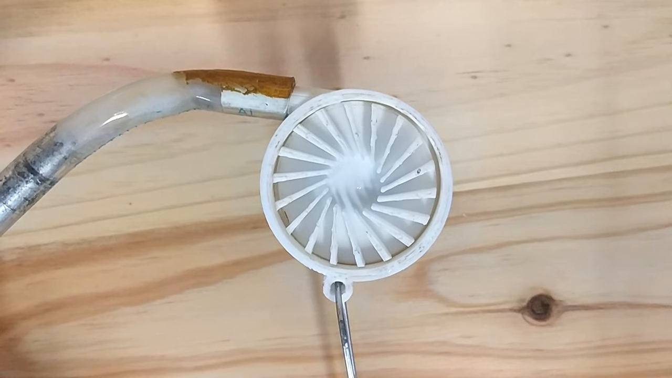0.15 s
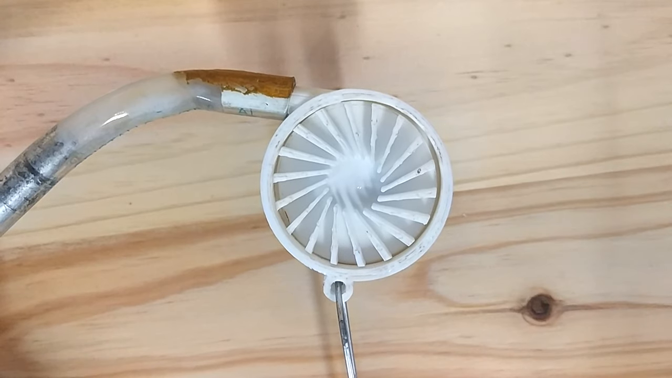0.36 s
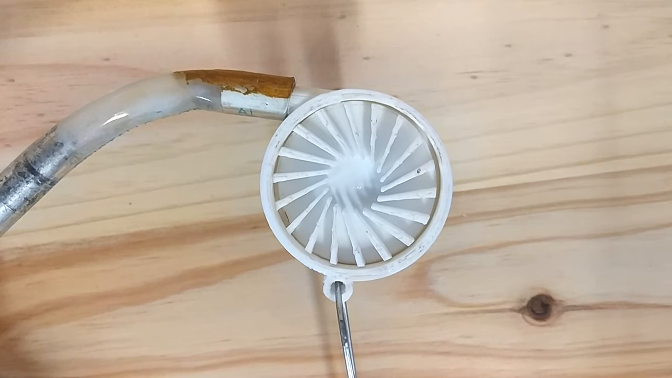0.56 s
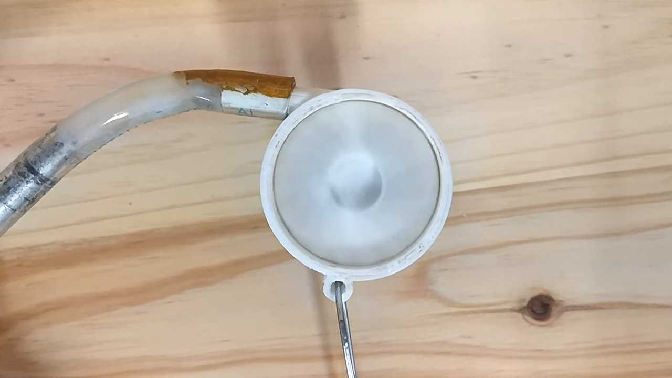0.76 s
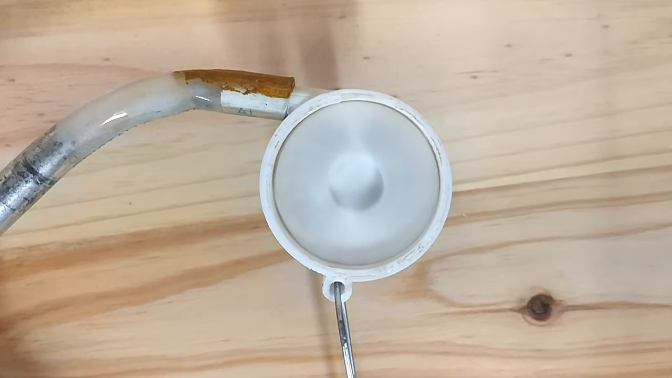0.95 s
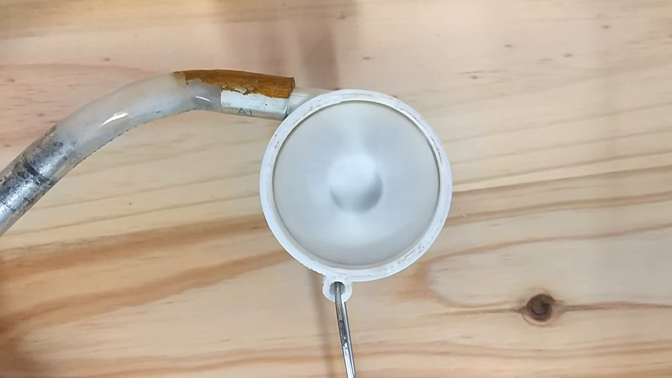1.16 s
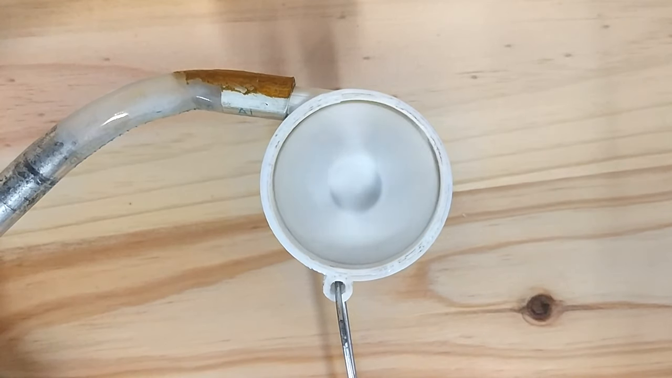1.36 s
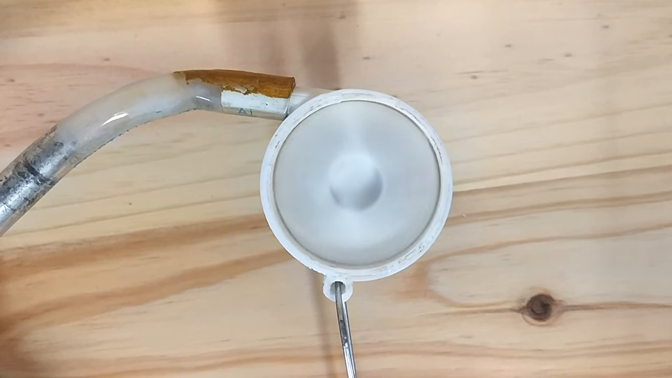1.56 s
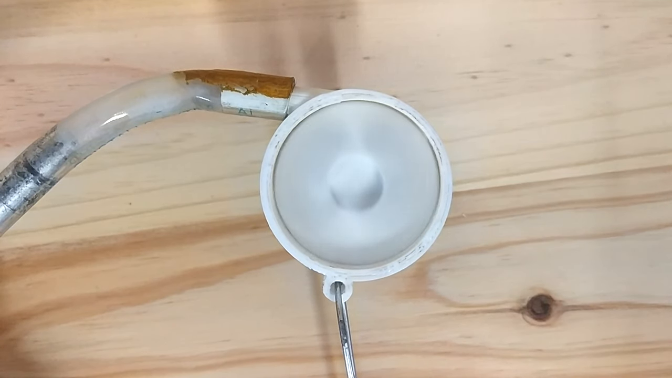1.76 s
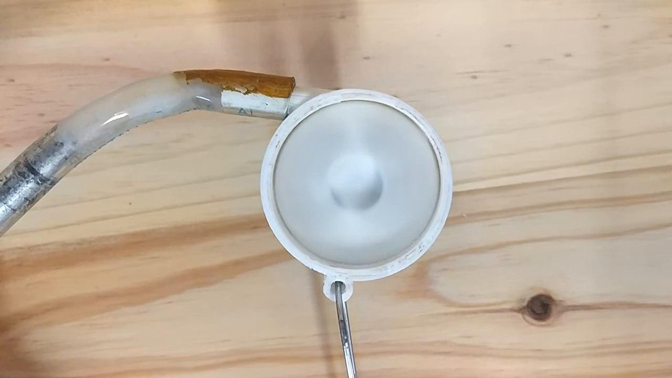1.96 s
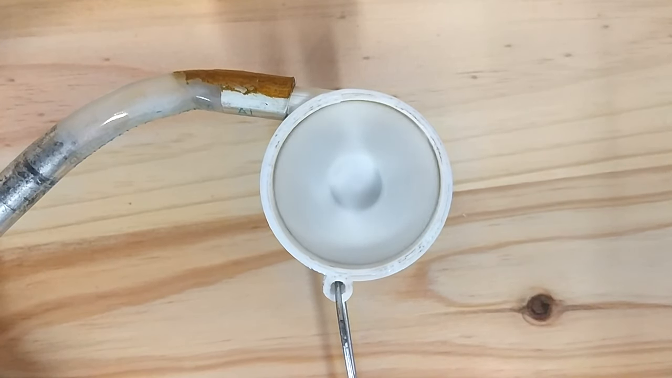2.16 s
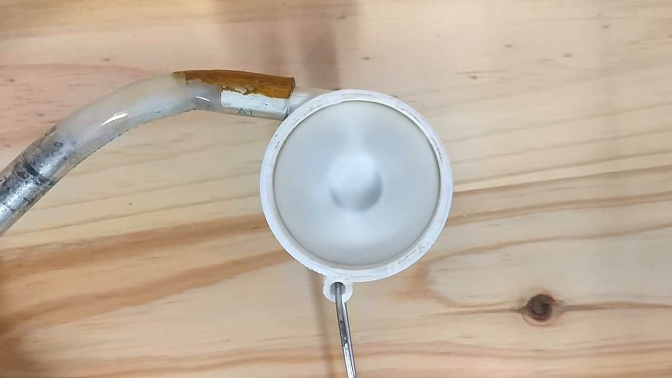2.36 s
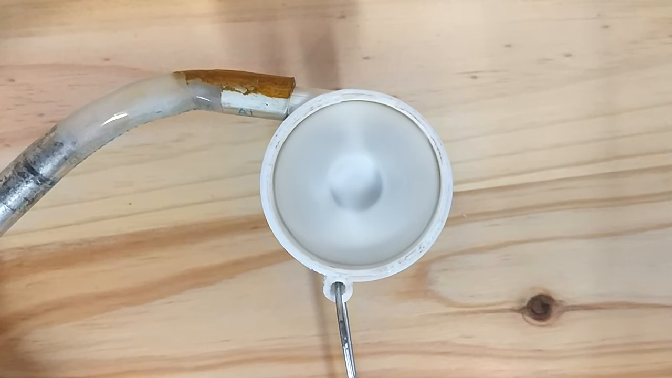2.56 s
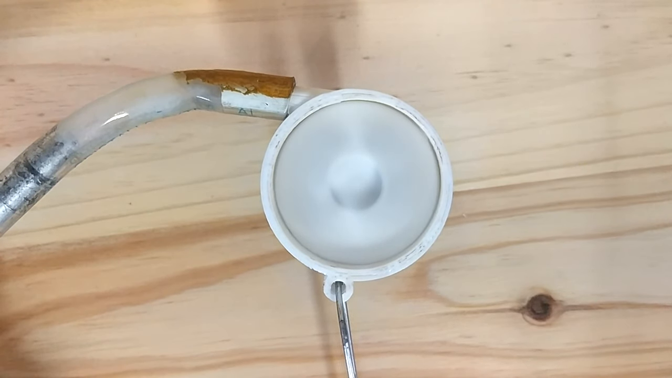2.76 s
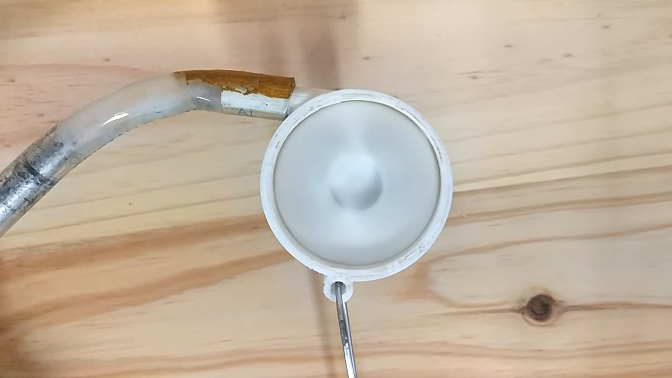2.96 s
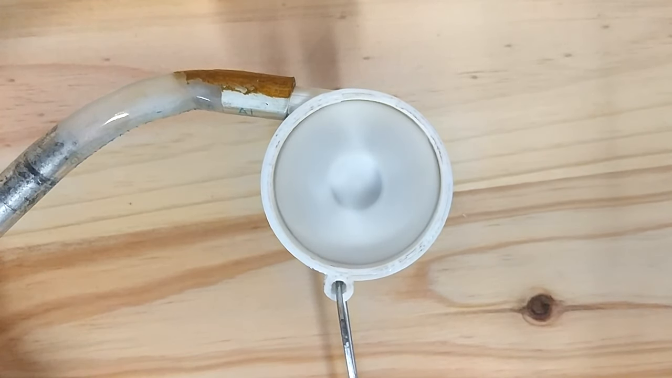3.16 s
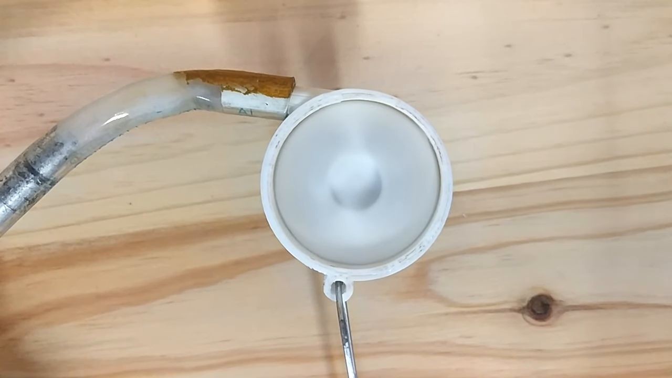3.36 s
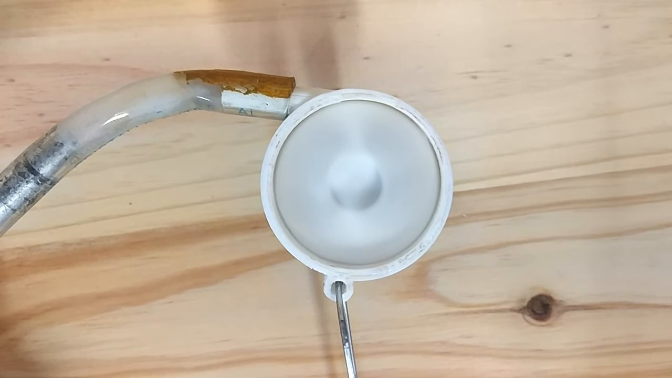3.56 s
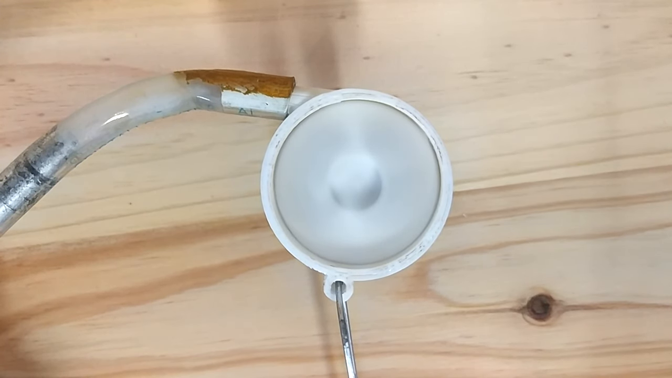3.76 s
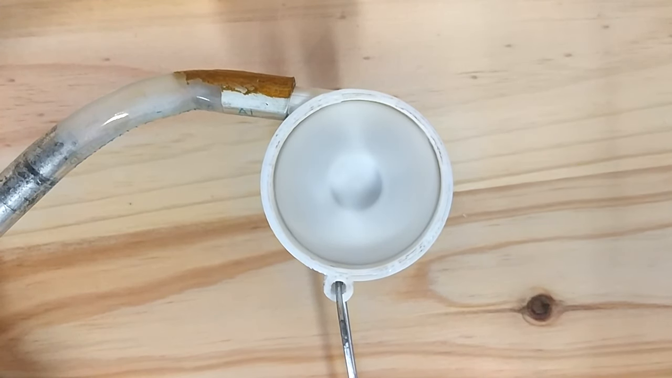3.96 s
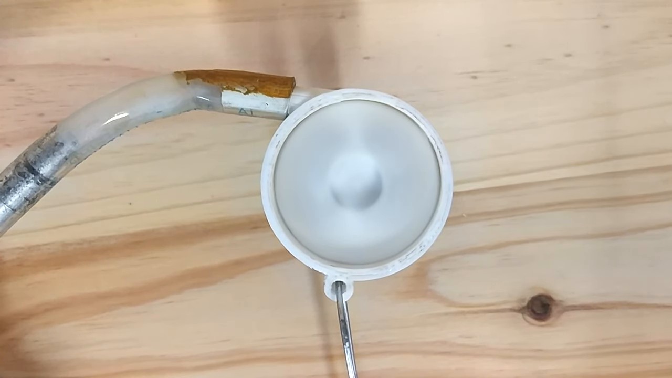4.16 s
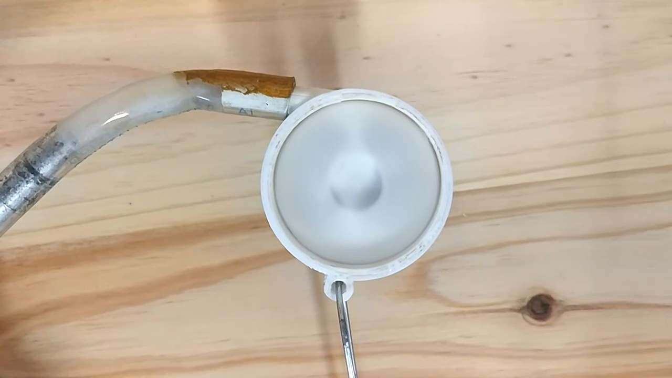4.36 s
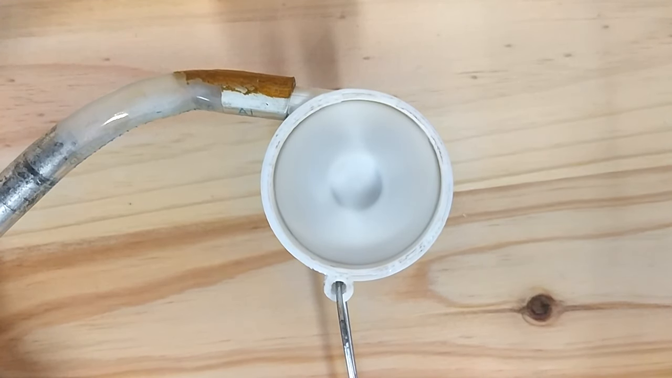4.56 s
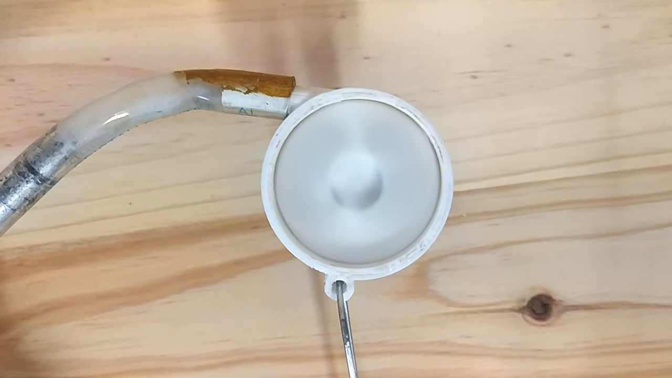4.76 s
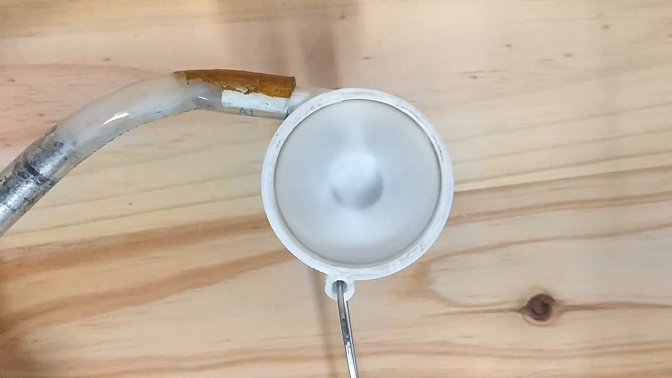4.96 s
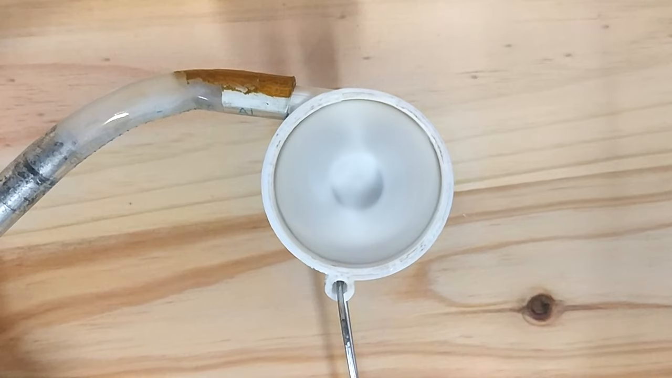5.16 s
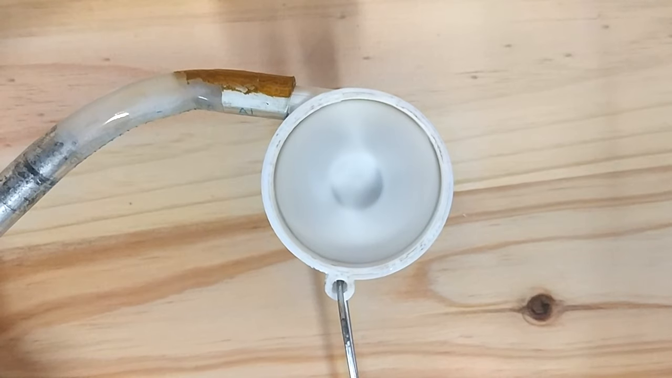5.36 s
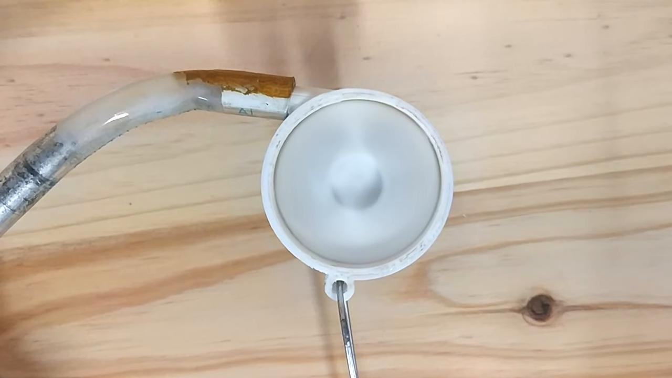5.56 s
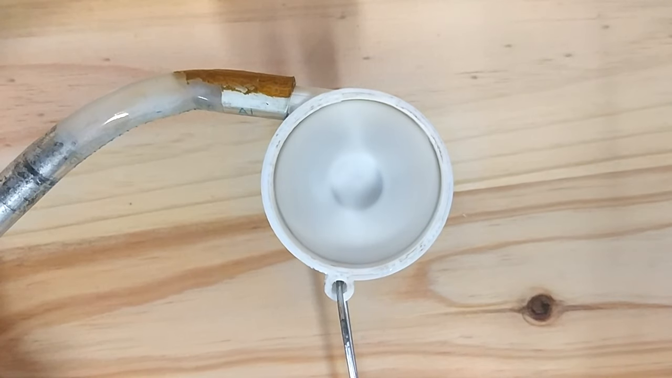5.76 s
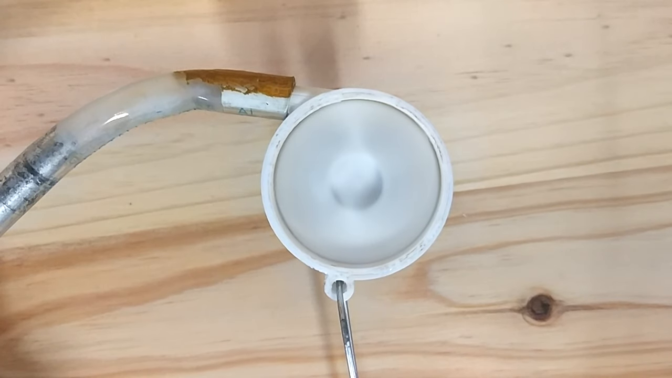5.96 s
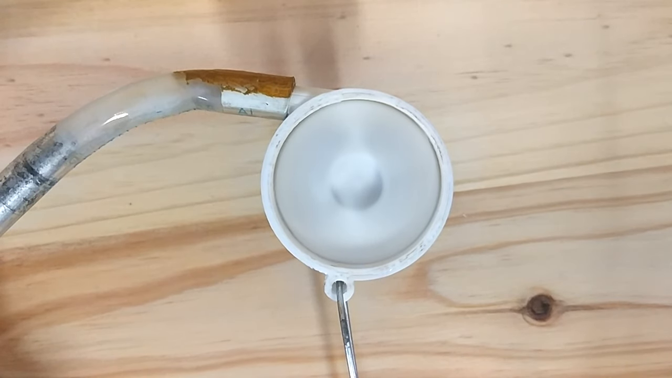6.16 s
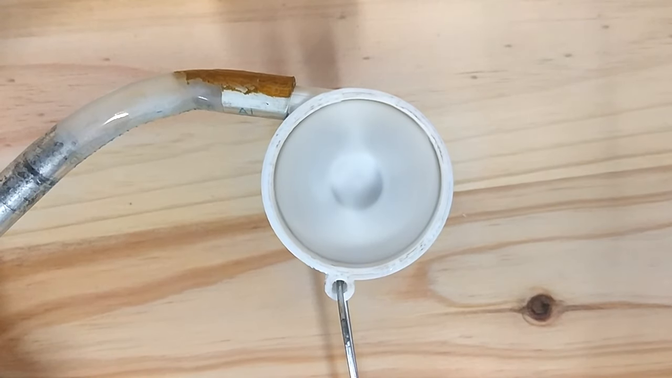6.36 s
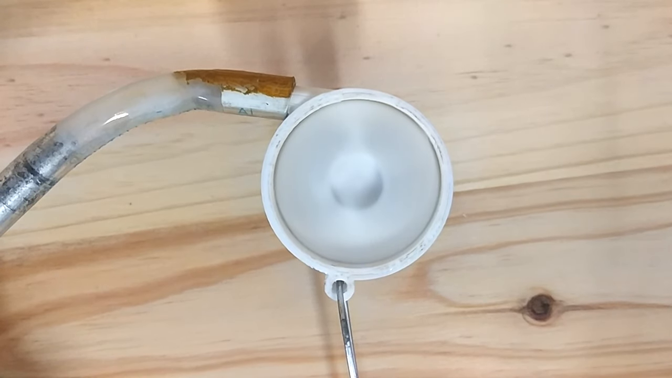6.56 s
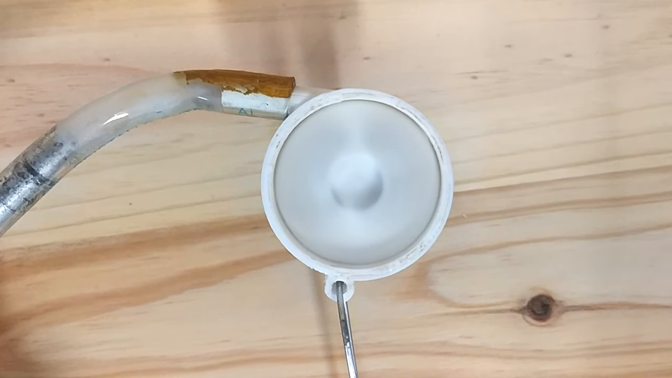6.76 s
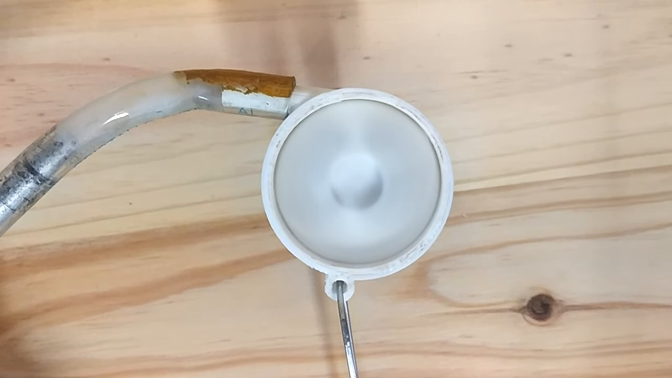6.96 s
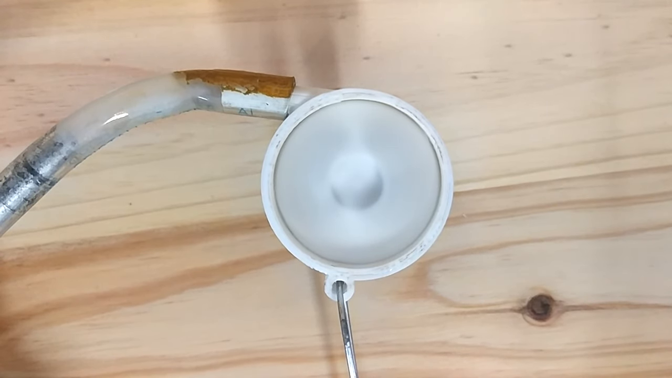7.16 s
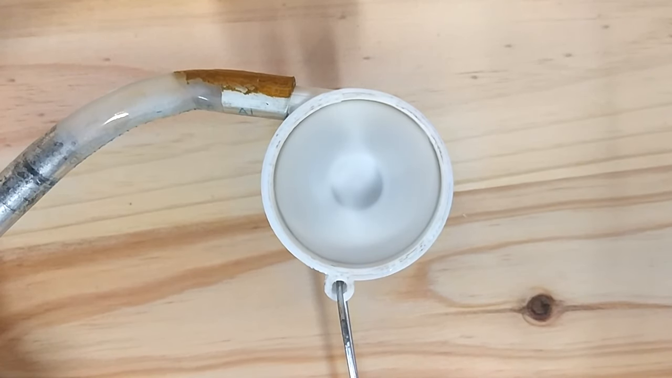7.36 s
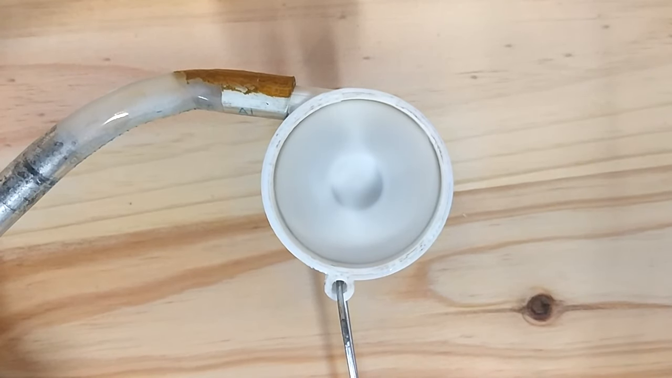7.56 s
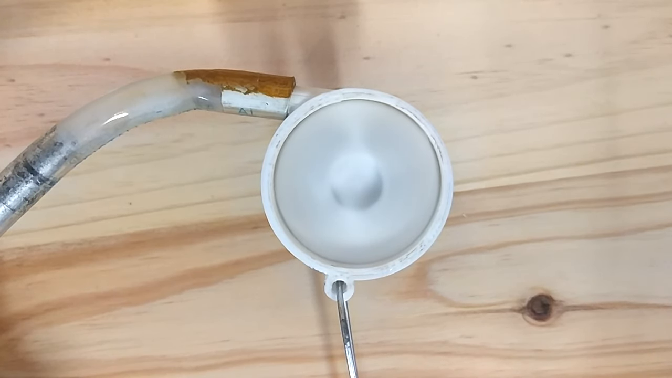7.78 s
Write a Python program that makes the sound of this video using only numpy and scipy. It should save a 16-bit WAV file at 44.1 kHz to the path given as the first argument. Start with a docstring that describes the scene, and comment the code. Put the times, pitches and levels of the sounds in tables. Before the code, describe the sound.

A short blast of compressed air starts a small plastic turbine, then the hiss steps up louder while a wavering blade whine climbs in pitch.

```python
"""Air-driven turbine on a workbench

A small plastic turbine with 18 blades stands on a wooden bench in a quiet workshop, close to a phone's two
microphone ports. A short blast of compressed air starts the rotor, then the valve opens step by step.
Filtered noise makes the jet's hiss, swayed once a turn while the rotor is slow; sine lines at multiples
of the turning rate make the blades' wavering whine; noise and knocks through resonances make the bench drone.
"""
import sys
import numpy as np
from scipy import signal
from scipy.fft import rfft, irfft
from scipy.io import wavfile

SR = 44100
rng = np.random.default_rng(int(sys.argv[2]) if len(sys.argv) > 2 else 0)


def dump_mix(stems):
    """Bounce the given channels to the path in sys.argv[1] as a 16-bit WAV at rate SR."""
    frames = np.atleast_2d(stems).T  # one column per channel
    limited = np.clip(frames, -1, 1)  # hard clip at full scale
    pcm = np.round(limited * 32767).astype(np.int16)
    wavfile.write(sys.argv[1], SR, pcm)


N = 344862
TIME = np.arange(N) / SR  # s
FREQ = np.maximum(np.arange(N // 2 + 1) * SR / N, 1)  # Hz, kept off zero

# Quiet workshop, its tone colour. Each row: frequency in Hz, relative level in dB.
ROOM_COLOUR = [(40, -36), (100, -18), (140, -28), (185, 7), (243, 6), (275, -1), (450, -3.5), (1100, -1),
               (2000, 3.5), (8500, 4), (12000, -5), (15000, -12)]
# Faint tones after the starting blast. Each row: frequency in Hz, starting level in dB, fall by 60 dB in seconds.
RINGING_TONES = [(592.2, -73.5, 4), (1723, -74.5, 12)]
# Modes of the bench top. Each row: frequency in Hz, width in Hz, gain in dB.
BENCH_MODES = [(166, 18, -13), (181, 11, 0.5), (189, 12, -4), (203, 24, -11), (242, 19, -1.5),
               (291, 24, -8), (343, 22, -5), (380, 36, -7)]
# Knocks of the unbalanced rotor. Each row: multiple of the turning rate,
# level in dB at top speed before the bench top colours it.
ROTOR_KNOCKS = [(2, -41.5), (3, -45.5), (4, -51)]
# Colour of the spent air. Each row: frequency in Hz, relative level in dB.
EXHAUST_COLOUR = [(30, -39), (80, -18), (135, -11), (200, 6.5), (400, 3), (520, 0), (700, 2), (1000, -0.5),
                  (1300, -12), (2000, 12.5), (3500, -65), (8000, -40)]
# Eddies shed by the blades. Each row: multiple of the turning rate, width in Hz, level in dB at full flow,
# delay at the left port in samples.
SHED_EDDIES = [(18.5, 150, -44, 12), (36.6, 230, -47, 6)]
# Howl of slipping blades. One row: multiple of the turning rate, width in Hz, level in dB when fully there.
SLIP_HOWL = (18.3, 70, -49)
# Blade tone and the sidebands of uneven blades. Each row: multiple of the turning rate, relative level in dB.
BLADE_LINES = [(11, -20), (12, -20), (14, -16), (15, -20), (16, -10), (17, -11), (18, 0), (19, -4),
               (20, -16), (36, -10), (37, -12)]
# Air resonances of casing and blade pockets. Each row: frequency in Hz, width in Hz,
# relative level in dB at gentle flow, relative level in dB at full flow.
CASING_RESONANCES = [(2567, 700, -19.5, -14), (3138, 210, -15, -9), (3580, 160, -18, -10.5),
                     (4326, 470, -11.5, -5.5), (4997, 700, -5.0, -3), (5897, 284, -4.5, -1),
                     (6175, 320, -8.5, 3), (6790, 570, -4.5, -4), (7165, 670, -0.5, -0.5),
                     (7846, 430, 0, 1.5), (8450, 470, -11, 2.5), (9000, 330, -13, -15), (9230, 880, -6, 3),
                     (10010, 390, -4.5, 0), (10360, 340, -1, 0.5), (10920, 530, -4.5, -2.0),
                     (12200, 250, -7, -10), (12160, 280, -6.5, 4), (12800, 720, -13, -1.5),
                     (13340, 350, -5.5, 2), (14250, 670, -9, -7), (14900, 320, -25, -2),
                     (15680, 290, -27, -11.5)]
# Broad hiss of the free jet. Each row: frequency in Hz, relative level in dB at gentle flow, the same at full flow.
JET_COLOUR = [(300.0, -95, -77), (1014, -29, -18), (2360, -28.5, -16.5), (3820, -38, -17.5),
              (5100, -15.5, -4), (6800, -18, -2.5), (9620, -9, -3), (13650, -18, -10), (16100, -34, -11.5)]
# Notches where the narrow jet meets its reflection from the bench. Each row: frequency in Hz, width in Hz,
# gain in dB at the left port, gain in dB at the right port.
BENCH_NOTCHES = [(3870, 180, -11, -6), (4550, 170, -8, -10), (5630, 200, -16, -2), (6200, 130, -20, 0),
                 (6530, 150, -9, -5), (7560, 160, -9, -1), (8180, 150, -8, 0), (8580, 240, -13, 0),
                 (9120, 150, -11, 0), (10150, 160, -8, 0), (11120, 380, -16, 0), (11680, 160, 0, -5),
                 (13100, 180, -4, -4), (13720, 160, -6, -6), (14620, 200, -7, -2), (15430, 380, -14, -4)]
# Each turn of the valve. Each row: start in seconds, time it takes in seconds, jet strength reached in dB,
# rotor speed it sustains in turns per second.
VALVE_TURNS = [(.7, 0.0394, -47, 9.2), (1.2, 0.2503, -38, 12), (1.52, 0.0511, -33, 20),
               (1.899, .11, -29, 28), (2.67, .12, -25, 56.3), (3.97, .11, -22.5, 75.2),
               (4.3, .53, -20, 79.5)]
# The rotor runs freer or drags for a moment. Each row: start in seconds, build-up in seconds,
# change in turns per second.
ROTOR_SURGES = [(2.94, .2, 3.9), (3.39, .24, 5.3), (4.01, .16, 4), (4.19, .13, 5.7), (4.57, .05, -5.5),
                (4.88, .1, 12.5), (5.57, .03, 3.5), (5.93, .02, 3), (6.04, .19, 9), (6.41, .05, -3),
                (6.62, .05, 3.5), (6.83, .08, 1.7), (6.94, .19, 6.6), (7.35, .32, 7.4)]

ROOM_DB = -60.5
PORT_LAG_SAMPLES = 12  # the left port is further away
TOP_HZ = 15720  # upper limit of the microphone
# Starting blast: jet strength at its peak, then its timing
BLAST_S, BLAST_DB = 0.6935, -27.5
BLAST_ATTACK_S, BLAST_HOLD_S, BLAST_RELEASE_S = 0.043, 0.076, 0.033
# Each of the rotor's two lags behind the valve, fading of a surge, usual speed with the valve wide open
INERTIA_S, SETTLE_S, TOP_SPEED = .089, .225, 83  # TOP_SPEED in turns per second
# Jet strength at which the jet begins to broaden and at which it fills the casing ("full flow")
GENTLE_DB, FILLED_DB = -26.5, -19.5
# Left minus right level at gentle and at full flow; the higher the power, the later the sound swings round
HISS_PAN_DB, WHINE_PAN_DB, SWING_POWER = (-11.5, -2.5), (-6.5, 3.5), 0.93
# Blade tone: level at full flow and top speed, growth with filling and with speed
WHINE_DB, WHINE_FILL_POWER, WHINE_SPEED_POWER = -41.8, .6, 1.0
WHINE_LAG_SAMPLES = (7.5, 12.5)  # delay at the left port at gentle and at full flow
# Acceleration at which the blades slip fully (turns per second per second), and what that adds to the tone
SLIP_ACCELERATION, SLIP_DB = 90, -5
HOWL_SPEED = 36  # turns per second from which the howl can be fully there
CALM_CHURN = .3  # unsteadiness of the blade tone at gentle flow, as a share of that at full flow
# Unsteadiness of each blade line at full flow: depth, then rate of wandering in Hz
WAVER_RAD, WAVER_HZ = .26, 45
FLICKER_DB, FLICKER_HZ = 2.1, 18
WANDER_DB, WANDER_HZ = 2.3, 5  # between left and right
# Sway of the hiss once a turn: share, its own random variation (share, Hz), part reaching the left port
FLUTTER, FLUTTER_SCATTER, FLUTTER_SCATTER_HZ, FLUTTER_LEFT = .66, .3, 5, .45
# Strength of spent air at idle, and at full flow and top speed; rush and rumble are set relative to it
IDLE_DB, EXHAUST_DB = -68.5, -51


def undb(db):
    """Decibels to gain."""
    return 10 ** (np.asarray(db) / 20)


def rms(x):
    """Root mean square."""
    return np.sqrt(np.mean(x ** 2))


def colour(hz, db):
    """Gain through (Hz, dB) points on a log-frequency axis."""
    return undb(np.interp(np.log(FREQ), np.log(hz), db))


def resonances(hz, width, db):
    """Gain of steep-sided resonances whose powers add."""
    power = 0
    for f, w, d in zip(hz, width, db):
        detuning = (FREQ / f - f / FREQ) * f / w
        power = power + (undb(d) / (1 + detuning ** 2)) ** 2
    return np.sqrt(power)


def through(x, gain):
    """Pass a sound through a gain given over frequency."""
    return irfft(rfft(x) * gain, N)


def noise(gain, likeness):
    """Coloured noise at two ports; the shared part reaches the left one later."""
    shared, left, right = rfft(rng.standard_normal((3, N)))
    late = np.exp(-2j * np.pi * FREQ * PORT_LAG_SAMPLES / SR)
    alike = np.clip(likeness, 0, 1)
    common = np.sqrt(alike) * np.array([shared * late, shared])
    separate = np.sqrt(1 - alike) * np.array([left, right])
    return irfft(gain * (common + separate), N)


def walk(rate_hz):
    """Smooth random wandering with a spread of 1."""
    x = through(rng.standard_normal(N), 1 / (1 + (FREQ / rate_hz) ** 2))
    return x / rms(x)


def pan(db):
    """Left and right gains of constant total power."""
    gains = undb(np.array([[1], [-1]]) * db / 2)
    return gains / np.sqrt(np.mean(gains ** 2, axis=0))


def ramp(start_s, length_s):
    """A straight rise from 0 to 1."""
    return np.clip((TIME - start_s) / max(length_s, .001), 0, 1)


def room(hum_hz=243, hum_db=-80):
    """Faint steady noise of the workshop, with a weak wavering hum."""
    likeness = 0.12 + 1.3 / (1 + (FREQ / 500) ** 2)  # the bass is alike at both ports
    x = noise(colour(*np.transpose(ROOM_COLOUR)), likeness)
    hum = np.sqrt(2) * np.sin(2 * np.pi * hum_hz * TIME + 0.31 * walk(5.4))
    return x / rms(x) * undb(ROOM_DB) + undb(hum_db) * hum


def after_ring(start_s=0.88, attack_s=0.1, flicker_db=3, waver_rad=0.7):
    """Faint unsteady tones swell after the starting blast and decay exponentially."""
    since = np.maximum(TIME - start_s - attack_s, 0)
    tones = 0
    for hz, db, t60_s in RINGING_TONES:
        level = undb(db - 60 * since / t60_s + flicker_db * walk(15))
        tone = np.sin(2 * np.pi * hz * TIME + waver_rad * walk(12))
        tones = tones + np.sqrt(2) * level * tone
    return ramp(start_s, attack_s) * tones


def valve_steps(values):
    """Move from each value to the next as the valve is turned."""
    steps = np.diff(values, prepend=0)
    return sum(step * ramp(row[0], row[1]) for row, step in zip(VALVE_TURNS, steps))


def air_flow():
    """Strength of the jet: the valve's setting, plus a blast that rises, holds and runs out."""
    spent_s = np.maximum(TIME - BLAST_S - BLAST_ATTACK_S - BLAST_HOLD_S, 0)
    blast = undb(BLAST_DB) * ramp(BLAST_S, BLAST_ATTACK_S) / (1 + spent_s / BLAST_RELEASE_S)
    return np.hypot(blast, valve_steps(undb([row[2] for row in VALVE_TURNS])))


def rotor_speed():
    """Turns per second: the rotor lags behind the valve; each surge builds up and settles again."""
    keep = np.exp(-1 / (INERTIA_S * SR))
    driven = valve_steps([row[3] for row in VALVE_TURNS])
    speed = signal.lfilter([(1 - keep) ** 2], np.poly([keep, keep]), driven)
    for start_s, rise_s, change in ROTOR_SURGES:
        settling = np.exp(-np.maximum(TIME - start_s - rise_s, 0) / SETTLE_S)
        speed = speed + change * ramp(start_s, rise_s) * settling
    return speed


def filling(air):
    """How far the jet fills the casing, 0-1."""
    return np.clip((air - undb(GENTLE_DB)) / (undb(FILLED_DB) - undb(GENTLE_DB)), 0, 1)


def slip(speed):
    """How far the rotor trails the jet, 0-1: it grows with the acceleration."""
    return np.clip(np.gradient(speed) * SR / SLIP_ACCELERATION, 0, 1)


def swing(air, gentle_db, full_db):
    """Left minus right level of a sound that swings round as the jet fills the casing."""
    return gentle_db + (full_db - gentle_db) * filling(air) ** SWING_POWER


def spent_air(air, speed, air_power=0.51, speed_power=0.96):
    """Strength of the air leaving the open face: it grows with both flow and speed."""
    flow_share = (air / undb(FILLED_DB)) ** air_power
    speed_share = (speed / TOP_SPEED) ** speed_power
    driven = undb(EXHAUST_DB) * flow_share * speed_share
    return np.hypot(undb(IDLE_DB), driven) * ramp(BLAST_S, BLAST_ATTACK_S)


def bench(air, turns, speed, rumble_db=-1.0, gentle_pan_db=-3, full_pan_db=4.0):
    """The bearing rumbles and the unbalanced rotor knocks at low multiples of its rate; the top rings with both."""
    modes = resonances(*np.transpose(BENCH_MODES))
    rumble = noise(modes, likeness=1.0)
    rumble = rumble / rms(rumble) * spent_air(air, speed) * undb(rumble_db)
    knocks = 0
    for multiple, db in ROTOR_KNOCKS:
        knock = np.sin(2 * np.pi * multiple * turns + 0.13 * walk(4.7))
        knocks = knocks + knock * undb(db + 0.76 * walk(8.6))
    knocks = through(knocks, modes) * (speed / TOP_SPEED) ** 2
    return (rumble + knocks) * pan(gentle_pan_db + (full_pan_db - gentle_pan_db) * filling(air))


def exhaust(air, speed, rush_db=7, gust_db=2.1):
    """A soft, low, gusting rush of spent air."""
    x = noise(colour(*np.transpose(EXHAUST_COLOUR)), likeness=0.59)
    return x / rms(x) * spent_air(air, speed) * undb(rush_db + gust_db * walk(20))


def swirl(turns, order, width_hz):
    """A narrow band of noise that rides on a multiple of the turning rate."""
    angle = 2 * np.pi * order * turns
    return walk(width_hz / 2) * np.cos(angle) + walk(width_hz / 2) * np.sin(angle)


def eddies(air, turns, speed):
    """Eddies blur the blade tone, and slipping blades howl; the howl reaches the ports in opposite phase."""
    order, width_hz, db = SLIP_HOWL
    strength = slip(speed) * np.minimum(speed / HOWL_SPEED, 1) ** 3
    howl = undb(db) * strength * swirl(turns, order, width_hz)
    out = howl * pan(swing(air, *WHINE_PAN_DB) / 2) * np.array([[-1], [1]])
    for order, width_hz, db, lag in SHED_EDDIES:
        shed = undb(db) * filling(air) * swirl(turns, order, width_hz)
        out = out + np.array([np.roll(shed, lag), shed])
    return out


def whine(air, turns, speed):
    """Blades chop the jet once it fills the casing; the tone roughens with flow and as the rotor gathers speed."""
    full, slipping = filling(air), slip(speed)
    churn = CALM_CHURN + (1 - CALM_CHURN) * full + slipping
    side_db = swing(air, *WHINE_PAN_DB)
    gentle_lag, full_lag = WHINE_LAG_SAMPLES
    lag_s = (gentle_lag + (full_lag - gentle_lag) * full) / SR
    angle = 2 * np.pi * np.array([turns - speed * lag_s, turns])
    out = 0
    for order, db in BLADE_LINES:
        line = np.sqrt(2) * np.sin(order * angle + WAVER_RAD * churn * walk(WAVER_HZ))
        sides = pan(side_db + WANDER_DB * full * walk(WANDER_HZ))
        out = out + line * undb(db + FLICKER_DB * churn * walk(FLICKER_HZ)) * sides
    growth = full ** WHINE_FILL_POWER * (speed / TOP_SPEED) ** WHINE_SPEED_POWER
    return out * undb(WHINE_DB + SLIP_DB * slipping) * growth


def hiss_at(column, ring_likeness, jet_likeness):
    """Jet noise at gentle (0) or full (1) flow: the ringing casing plus the broad free jet."""
    casing, jet = np.transpose(CASING_RESONANCES), np.transpose(JET_COLOUR)
    x = noise(resonances(casing[0], casing[1], casing[2 + column]), ring_likeness)
    x = x + noise(colour(jet[0], jet[1 + column]), jet_likeness)
    return x / rms(x)


def beam(x, side_db, beam_hz=3900, low_share=0.35):
    """The treble beams towards one port; the lower hiss spreads more evenly."""
    low = through(x, 1 / (1 + (FREQ / beam_hz) ** 10))
    return low * pan(low_share * side_db) + (x - low) * pan(side_db)


def shade(x, air, make_up=0.74, stays=0.34):
    """Each port hears the narrow jet with its own notches; they partly fill in as the jet broadens."""
    notch_db = 0
    for hz, width_hz, left_db, right_db in BENCH_NOTCHES:
        notch_db = notch_db + np.array([[left_db], [right_db]]) / (1 + (2 * (FREQ - hz) / width_hz) ** 4)
    notched = through(x, undb(notch_db))
    # restore most of the level lost in the notches
    loss = np.std(x, axis=1, keepdims=True) / np.std(notched, axis=1, keepdims=True)
    notched = notched * loss ** make_up
    broad = (1 - np.clip(stays, 0, 1)) * filling(air) ** SWING_POWER
    return notched + broad * (x - notched)


def hiss(air, turns, speed, gentle_db=1.5, full_db=4.0, pocket_hz=7050, pocket_width_hz=1050,
         blur_speed=42, sputter_db=0.03, surge_db=0.5, speak_db=-36, starved=0.5, broaden_power=0.65):
    """The jet's hiss grows louder and broader as the valve opens; the wobbling rotor sways it once a turn."""
    full = filling(air) ** broaden_power
    x = np.sqrt(1 - full) * undb(gentle_db) * hiss_at(0, ring_likeness=0.34, jet_likeness=0.57)
    x = x + np.sqrt(full) * undb(full_db) * hiss_at(1, ring_likeness=0.33, jet_likeness=1.0)
    # the blade pockets ring fully only in a strong enough jet
    pocket = through(x, resonances([pocket_hz], [pocket_width_hz], [0]))
    speaking = 1 - 1 / (1 + (air / undb(speak_db)) ** 8)
    # they open and close with each turn, less so above blur_speed (turns per second)
    depth = FLUTTER * speaking * np.minimum(speed / 10, 1) / (1 + (speed / blur_speed) ** 4)
    depth = depth * np.clip(1 + FLUTTER_SCATTER * walk(FLUTTER_SCATTER_HZ), 0, 1 / FLUTTER)
    sway = np.array([[FLUTTER_LEFT], [1]]) * depth * np.cos(2 * np.pi * turns)
    x = x + (sway - starved * (1 - speaking)) * pocket
    # turbulence: fast sputter, strongest in the thin jet, and slower surges
    turbulence_db = sputter_db * (1 - 0.33 * full) * walk(560) + surge_db * walk(18.0)
    x = shade(beam(x, swing(air, *HISS_PAN_DB)), air)
    return x * air * undb(turbulence_db)


def reflections(x, echo_db=-12, t60_s=.2, dark_hz=2500):
    """Bench, tools and walls scatter the treble back, differently to each port, and comb it finely."""
    tail = rng.standard_normal((2, N)) * undb(-60 * TIME / t60_s) * (TIME > .003)
    tail = tail / np.sqrt(np.sum(tail ** 2, axis=1, keepdims=True))
    tail = through(tail, FREQ / np.hypot(FREQ, dark_hz))
    echo = signal.fftconvolve(x, tail[:, :SR // 4], axes=1)[:, :N]
    return (x + undb(echo_db) * echo) / np.sqrt(1 + undb(echo_db) ** 2)


def scene():
    """The valve sets flow and speed; the rotor's angle times the flutter, the whine and the knocking."""
    air, speed = air_flow(), rotor_speed()
    turns = np.cumsum(speed) / SR
    background = room() + after_ring() + bench(air, turns, speed)
    blades = exhaust(air, speed) + eddies(air, turns, speed) + whine(air, turns, speed)
    return background + blades + reflections(hiss(air, turns, speed))


def record(dry):
    """The phone's microphones thin the deep bass and cut the top steeply."""
    dry = signal.sosfilt(signal.butter(1, 70, "highpass", fs=SR, output="sos"), dry)
    return signal.sosfilt(signal.ellip(12, .1, 90, TOP_HZ, fs=SR, output="sos"), dry)


dry = scene()
out = record(dry)
dump_mix(out)
```